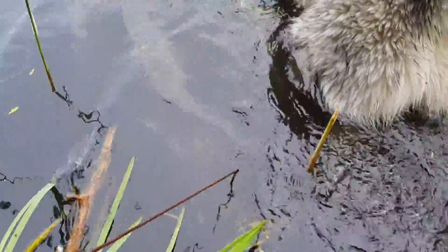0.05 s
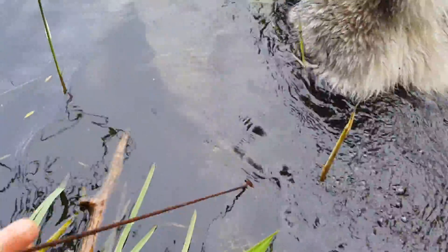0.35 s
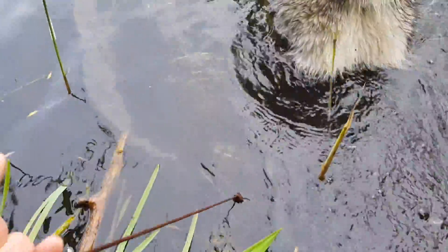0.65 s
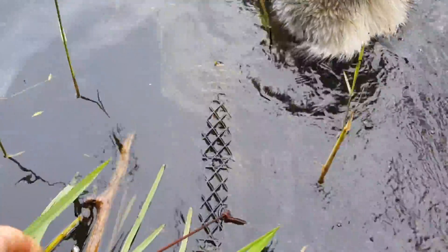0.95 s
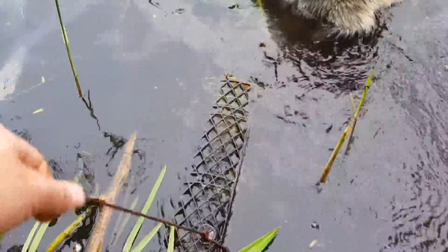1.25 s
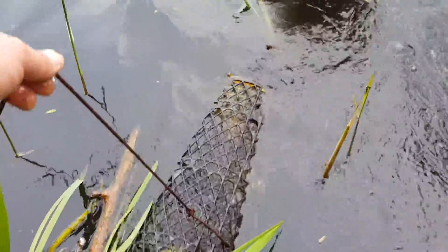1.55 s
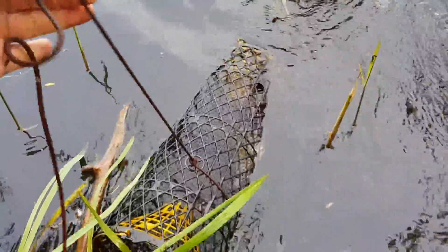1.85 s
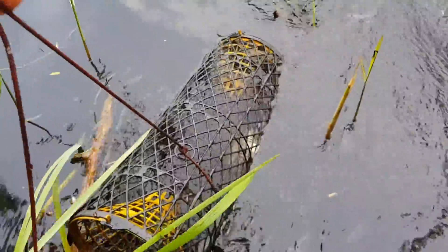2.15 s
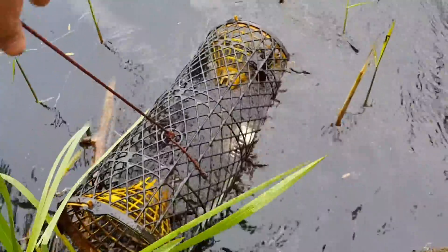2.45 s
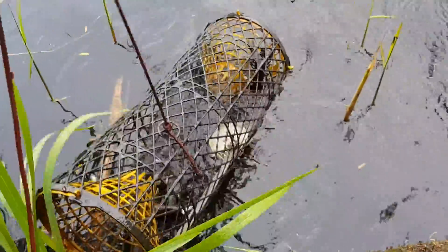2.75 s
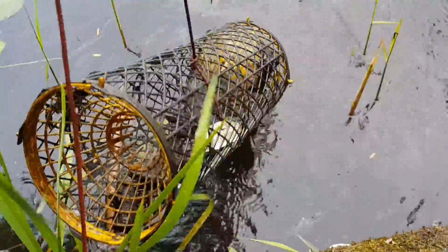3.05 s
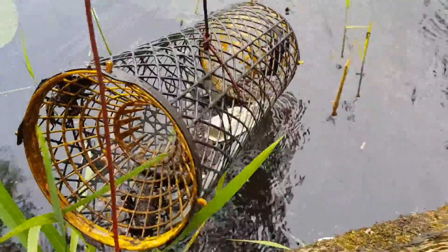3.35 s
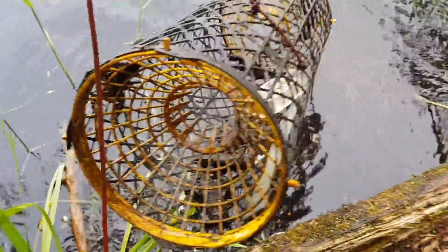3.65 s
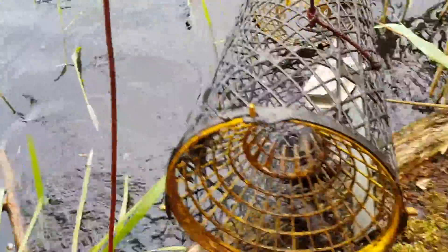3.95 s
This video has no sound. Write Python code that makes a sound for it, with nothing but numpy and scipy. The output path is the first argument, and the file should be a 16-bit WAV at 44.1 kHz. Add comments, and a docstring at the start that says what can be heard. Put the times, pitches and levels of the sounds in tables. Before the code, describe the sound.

Water splashes and drips as a mesh trap is hauled from a pond, birds chirping.

```python
"""At the edge of a pond, a stereo pair close to the water. A mesh trap is hauled out: its cord ticks
and water laps round it, then it breaks the surface with a splash and sheds gushes, single drips and
a last gurgle. The water sounds through ringing bubbles, the small ones high and the large ones low.
A small bird repeats thin falling notes in the trees on the bank, another whistles far off,
over a low outdoor rumble."""
import sys
import numpy as np
from scipy import signal
from scipy.fft import rfft, irfft
from scipy.io import wavfile
from scipy.ndimage import uniform_filter1d

SR = 44100
rng = np.random.default_rng(int(sys.argv[2]) if len(sys.argv) > 2 else 0)


def pcm_store(signal):
    """Save signal as 16-bit PCM."""
    levels = np.round(np.clip(np.atleast_2d(signal), -1, 1) * 32767)
    wavfile.write(sys.argv[1], SR, levels.astype(np.int16).T)


N = 176400
T = np.arange(N) / SR
EDGE_HZ = 16000
MIC_LAG = 3  # samples by which a drip's ring reaches the right microphone later


def amp(db):
    """Decibels to gain."""
    return 10 ** (np.asarray(db) / 20)


def unit(x):
    """Scales to rms 1."""
    return x / np.sqrt(np.mean(x ** 2) + 1e-20)


def read(points, hz):
    """Reads a table on a log-frequency axis."""
    f, value = np.transpose(points)
    return np.interp(np.log(hz + 1), np.log(f + 1), value)


def colour(x, points):
    """Filters by a table of dB over frequency."""
    gain = amp(read(points, np.fft.rfftfreq(2 * N, 1 / SR)))
    return irfft(rfft(x, 2 * N) * gain)[..., :N]


def add(mix, start_s, sound):
    """Mixes a sound in at a time."""
    part = mix[..., max(round(start_s * SR), 0):][..., :sound.shape[-1]]
    part += sound[..., :part.shape[-1]]


def echoes(x, t60_s, build_s):
    """Scattered reflections that build up and die away, different at each microphone."""
    t = T[:SR]
    taps = rng.standard_normal((2, SR)) * (rng.random((2, SR)) < .1)
    taps *= amp(-60 * t / t60_s) * np.minimum(t / build_s, 1)
    taps /= np.linalg.norm(taps, axis=1, keepdims=True)
    return signal.fftconvolve(np.atleast_2d(x), taps, axes=1)[:, :N]


def bubble(hz, decay_s):
    """A ringing bubble whose pitch climbs as it nears the surface, where it bursts."""
    t = T[:int(4 * decay_s * SR) + 8]
    phase = 2 * np.pi * hz * (t + .015 * t * t / decay_s / 2)  # climbs 1.5 % per decay time
    return np.sin(phase) * np.exp(-t / decay_s) * np.cos(np.pi / 2 * t / t[-1])


def patter(per_s, low_hz, high_hz, cycles, spread_db, sizes=40):
    """A rain of bubbles of many sizes, each size from its own place."""
    strikes = (rng.random(N) < per_s / SR) * amp(spread_db * np.minimum(rng.exponential(1, N), 4))
    size, out = rng.integers(0, sizes, N), np.zeros((2, N))
    for k, hz in enumerate(np.linspace(low_hz ** .5, high_hz ** .5, sizes) ** 2):
        ring = hz / high_hz * signal.oaconvolve(strikes * (size == k), bubble(hz, cycles / hz))[:N]
        out += [ring, np.roll(ring, rng.integers(-2, 3 * MIC_LAG))]
    return unit(out)


def air():
    """Low outdoor rumble, alike at both microphones, under a faint diffuse hiss."""
    # background spectrum: frequency_hz, density_db
    spectrum = [(20, -41), (35, -9), (55, -0.5), (110, -1.5), (160, -5), (250, -7.5), (400, -15),
                (650, -25), (1400, -31), (2200, -25), (5500, -27), (9000, -34), (16000, -33)]
    # background level: time_s, level_db
    levels = [(0, -52.5), (.7, -50), (1.2, -53.5), (2.3, -51), (2.7, -50), (4, -49.5)]
    # likeness of left and right: frequency_hz, correlation
    likeness = [(60, 0.96), (290, 0.92), (640, 0.25), (1400, 0.073), (3100, 0.028)]
    left, other = rfft(rng.standard_normal((2, N)))
    same = read(likeness, np.fft.rfftfreq(N, 1 / SR))
    right = same * left + np.sqrt(1 - same ** 2) * other
    noise = irfft(np.array([left, right]), N)
    return unit(colour(noise, spectrum)) * amp(np.interp(T, *np.transpose(levels)))


def swells():
    """Brief low bumps rise and fade a few times."""
    # low swells: middle_s, width_s, level_db
    rises = [(1.52, 0.067, -48), (1.66, 0.039, -46.5), (1.8, .035, -47.5), (2.122, 0.017, -44.5),
             (3.63, 0.045, -50.5), (3.9, 0.14, -51)]
    # their spectrum: frequency_hz, gain_db
    spectrum = [(20, -41), (55, -0.5), (130, 0), (250, -13.5), (600, -36), (2000, -85)]
    level = sum(amp(db) * np.exp(-((T - middle) / width) ** 2 / 2) for middle, width, db in rises)
    return level * unit(colour(rng.standard_normal(N), spectrum))


def far_bird():
    """Far off: soft wavering whistles that reach the microphones only as echoes."""
    # whistles: start_s, length_s, first_hz, last_hz, level_db
    whistles = [(0.2, 0.12, 2550, 2650, -58), (0.377, .16, 2220, 2080, -59.5),
                (0.703, 0.28, 2420, 2200, -56), (1.068, 0.22, 3050, 3000, -66)]
    out = np.zeros(N)
    for start, length, first_hz, last_hz, db in whistles:
        progress = np.linspace(0, 1, int(length * SR))
        waver = 1 + .035 * unit(uniform_filter1d(rng.standard_normal(len(progress)), size=90))
        pitch = waver * (first_hz + (last_hz - first_hz) * progress)
        level = amp(db) * np.abs(np.sin(np.pi * progress)) ** .5
        add(out, start, level * np.sin(2 * np.pi * np.cumsum(pitch) / SR))
    return echoes(out, t60_s=0.34, build_s=0.0024)


def near_bird():
    """On the bank: notes flick down onto a held pitch, some end in a hoarse fall. The trees ring on."""
    # notes: start_s, hold_s, pitch_hz, level_db, closing_fall_hz, left_over_right_db, roughness (0-1)
    notes = [(0.015, 0.063, 5620, -47, 2194, 2.5, 0.16), (0.382, 0.07, 4800, -45.5, -0.5, 0, 0),
             (0.477, .018, 5300, -54.5, -1, 3, 0.3), (.725, .056, 5590, -45, 2248, -3, 0.14),
             (1.112, 0.07, 5596, -45, 2200, 2, 0), (1.456, 0.0865, 4810, -48, -5, 0.5, 0.11),
             (1.561, 0.019, 5140, -55.5, 0, 9, 0.34), (1.788, 0.061, 5620, -44.5, 2192, -3.5, 0.08),
             (2.153, 0.039, 3740, -51, 13, 1, 0.94)]
    # hoarse part of the voice: frequency_hz, gain_db
    rasp_spectrum = [(2500, -46), (3500, -7.5), (4500, -0.5), (5800, 4.5), (6700, 0), (8000, -21)]
    flick_hz, flick_s, sag_per_s = 7100, .0058, .45
    rise_s, release_s = .008, .015
    fall_s, fall_length_s, fall_db = .014, .058, -21
    out, t = np.zeros((2, N)), T[:SR // 4]
    rasp = unit(colour(rng.standard_normal(N), rasp_spectrum))
    for start, hold, hz, db, fall_hz, pan_db, rough in notes:
        fallen = 1 - np.exp(-np.maximum(t - hold, 0) / fall_s)
        hoarse_fall = fallen * (fall_hz > 0)
        flick = (flick_hz - hz) * np.exp(-t / flick_s)
        pitch = hz * (1 - sag_per_s * np.minimum(t, hold)) + flick - fall_hz * fallen
        wobble = unit(uniform_filter1d(rng.standard_normal(len(t)), size=30))
        pitch *= 1 + .06 * (rough + .6 * hoarse_fall) * wobble
        tone = np.sin(2 * np.pi * np.cumsum(pitch) / SR)
        hoarse = amp(-18) * (1 + 3 * rough + 6 * hoarse_fall) * rasp[int(start * SR):][:len(t)]
        end = hold + fall_length_s * (fall_hz > 0)
        release = np.exp(-np.maximum(t - end, 0) / release_s)
        level = np.minimum(t / rise_s, 1) * amp(db + fall_db * fallen) * release
        add(out, start, amp([[pan_db / 2], [-pan_db / 2]]) * level * (tone + hoarse))
    early = amp(3) * echoes(out, t60_s=0.11, build_s=0.0032)
    late = amp(1) * echoes(out.mean(0), t60_s=0.57, build_s=0.049)
    return out + early + late


def fizz():
    """Tiny bubbles burst on the wet mesh."""
    # fizz level: time_s, level_db
    levels = [(0, -58), (.1, -52), (.3, -56), (.55, -55.5), (.75, -61), (.93, -57.5), (1.02, -63.5),
              (1.35, -61.5), (1.8, -61), (2.15, -58), (2.4, -60), (2.7, -62), (3.03, -55), (3.1, -50),
              (3.55, -52.5), (3.75, -55), (3.84, -46.5), (4, -52)]
    bursts = patter(per_s=1500, low_hz=4500, high_hz=15360, cycles=2.8, spread_db=3.5)
    return amp(np.interp(T, *np.transpose(levels))) * bursts


def slosh():
    """A dense wash of middle-sized bubbles as the trap drags through the water."""
    # lapping round the trap: time_s, level_db
    levels = [(0, -64.5), (.12, -57), (.34, -60.5), (.42, -67.5), (1.2, -74), (1.58, -72), (1.66, -63.5),
              (1.85, -66.5), (2.7, -69.5), (2.88, -55), (3.0, -54.5), (3.3, -62), (3.6, -86), (3.76, -60.5),
              (3.84, -56.5), (4, -47.5)]
    # tone of the wash: frequency_hz, gain_db
    tone = [(200, -29.5), (450, 3.5), (700, -4), (1100, -11), (1700, -21), (3000, -7)]
    wash = patter(per_s=1400, low_hz=320.5, high_hz=1980, cycles=5.0, spread_db=5.0)
    return amp(np.interp(T, *np.transpose(levels))) * unit(colour(wash, tone))


def ticks():
    """Short dry snaps as the cord and mesh take the strain."""
    # snaps: start_s, level_db
    snaps = [(.19, -41), (.231, -33.5), (.313, -40), (.459, -39), (.523, -39), (0.681, -29.5), (.702, -36),
             (0.711, -44), (0.827, -32.5), (1.047, -36.5), (1.104, -30), (1.371, -33), (1.386, -44.5),
             (1.756, -37), (1.969, -47), (2.422, -42), (2.606, -39), (2.701, -41), (3.061, -30.5),
             (3.122, -32.5), (3.294, -24.5), (3.488, -34), (3.89, -30.5)]
    # their spectrum: frequency_hz, gain_db
    spectrum = [(500, -42), (2500, -19), (6000, 7.5), (9000, 6), (15000, 1)]
    out, decay_s = np.zeros((2, N)), .00061
    decay = np.exp(-T[:600] / decay_s)
    for start, db in snaps:
        add(out, start, amp(db) * .5 * rng.standard_normal((2, len(decay))) * decay)
    return colour(out, spectrum)


def gurgles():
    """Displaced water makes clusters of large bubbles around a gliding pitch."""
    # bubble clusters: start_s, length_s, first_hz, last_hz, level_db
    clusters = [(0.058, 0.054, 630, 1250, -64), (0.114, 0.021, 1300, 2750, -53),
                (0.276, 0.082, 700, 926, -57.5), (.5, 0.11, 660, 1020, -63.5),
                (0.703, 0.038, 507, 700, -56.5), (2.84, 0.067, 1330, 870, -45),
                (3.076, .08, 1130, 1290, -56), (3.266, 0.12, 1210, 970, -57.5), (3.8, .04, 1030, 1160, -46),
                (3.828, .03, 570, 520, -49.5), (3.874, .045, 1130, 860, -45),
                (3.928, 0.071, 490, 693, -44.5), (3.956, 0.048, 1010, 1180, -44)]
    bubbles_per_s, pitch_spread = 170, .1852
    out = np.zeros(N)
    for start, length, first_hz, last_hz, db in clusters:
        cluster, count = np.zeros(SR // 2), max(int(length * bubbles_per_s), 2)
        for k, (jitter, detune, strength) in enumerate(rng.random((80, 3))[:count]):
            progress = (k + jitter) / count
            hz = (first_hz + (last_hz - first_hz) * progress) * np.exp(pitch_spread * (2 * detune - 1))
            add(cluster, progress * length, (0.19 + strength) * bubble(hz, decay_s=.007))
        add(out, start, amp(db) * cluster * np.sqrt(length * SR / np.sum(cluster ** 2)))
    return np.array([out, np.roll(out, 3 * MIC_LAG)])


def gushes():
    """Sheets of water break into dense droplets and fine spray."""
    # water spilling from the mesh: start_s, length_s, level_db
    spills = [(0.062, 0.15, -63.5), (0.826, 0.12, -62.5), (2.704, 0.06, -49.5), (2.768, 0.027, -40),
              (2.814, 0.031, -41), (2.842, 0.033, -38), (2.892, 0.0092, -44), (2.911, 0.077, -48),
              (3.056, 0.085, -50.5), (3.134, 0.13, -50), (3.285, 0.014, -42.5), (3.367, 0.013, -58),
              (3.394, 0.069, -57), (3.783, 0.12, -52), (3.943, 0.051, -41.5)]
    # tone of the splash: frequency_hz, gain_db
    tone = [(300, -39), (600, -20.5), (1100, -2), (2000, 2.5), (3500, 3), (6000, -2), (8000, -0.5),
            (12500, -9.5), (16000, -16.5)]
    rise_s, fall_s = .0034, .029
    power = np.zeros(N)
    for start, length, db in spills:
        rise = np.clip((T - start) / rise_s, 0, 1)
        fall = np.exp(-np.maximum(T - start - length, 0) / fall_s)
        power += (amp(db) * rise * fall) ** 2
    droplets = patter(per_s=2400, low_hz=700, high_hz=13930, cycles=1.66, spread_db=4.3)
    spray = amp(-8) * rng.standard_normal((2, N))
    return np.sqrt(power) * unit(colour(droplets + spray, tone))


def drips():
    """Close to the microphones: a tick as each drop lands, then its trapped bubble rings."""
    # drops: start_s, level_db, pitch_hz, decay_ms
    drops = [(.166, -37.5, 1660, 1.1), (.17, -38, 2800, 0.65), (.677, -47.5, 1580, 16),
             (1.592, -45, 1790, 18), (2.7643, -25.5, 2730, 2.2), (2.7836, -14, 5680, 1.1),
             (2.79, -42, 5500, 1), (2.796, -28, 3340, 4), (2.821, -32, 3400, 1.5),
             (2.8378, -25.5, 4700, 1.2), (2.857, -19.5, 3270, 0.63), (2.8601, -27.5, 2350, 2.2),
             (2.882, -31.5, 1950, 5.8), (2.891, -27, 830, 2.5), (3.1208, -33.5, 1260, 1.1),
             (3.1612, -29, 5500, 0.71), (3.182, -33, 5300, 1.3), (3.217, -34.5, 5200, 1.2),
             (3.25, -35.5, 3450, 2), (3.294, -30, 3370, 0.76), (3.312, -34.5, 1260, 2.7),
             (3.3332, -29, 5140, 0.96), (3.3471, -26, 4680, 1.6), (3.369, -37, 1500, 1.6),
             (3.444, -38.5, 2940, 4), (3.508, -31.5, 3530, 3.3), (3.545, -32.5, 1855, 9.6),
             (3.597, -31.5, 2550, 5), (3.6175, -35, 3380, 2.8), (3.64, -41, 3740, 1.5),
             (3.708, -46.5, 1690, 4.4), (3.7974, -26, 4400, 1.8), (3.858, -37.5, 3020, 4.7),
             (3.947, -30, 3400, 1.8), (3.948, -30, 565, 13), (3.967, -27.5, 4750, 2.4),
             (3.966, -34, 1017, 12)]
    # spectrum of the landing: frequency_hz, gain_db
    impact_spectrum = [(300, -22), (1200, -33), (3500, 7), (7000, 10.5), (15000, -21)]
    impacts, impact_s = np.zeros((2, N)), .0008
    decay = np.exp(-T[:600] / impact_s)
    for start, db, _, _ in drops:
        add(impacts, start, amp(db - 8) * rng.standard_normal((2, len(decay))) * decay)
    out = colour(impacts, impact_spectrum)
    for start, db, hz, decay_ms in drops:
        ring = np.pad(amp(db) * bubble(hz, decay_ms * 1e-3), (0, MIC_LAG))
        add(out, start, np.array([ring, np.roll(ring, MIC_LAG)]))
    return out


def scene():
    """The trap close by, with short reflections off the bank; birds and air behind."""
    # mesh and reeds scatter mostly treble: frequency_hz, gain_db
    scatter = [(300, -6), (1200, -15), (3000, -0.5), (6000, 0), (16000, 1.5)]
    trap = fizz() + drips() + ticks() + gushes() + gurgles() + slosh()
    reeds = amp(-4) * colour(echoes(trap, t60_s=.03, build_s=0.00066), scatter)
    bank = amp(-13.5) * echoes(trap, t60_s=0.45, build_s=0.013)
    return trap + reeds + bank + near_bird() + far_bird() + air() + swells()


def record(dry):
    """Each microphone's colour, then the band limit."""
    # left microphone response: frequency_hz, gain_db
    left_mic = [(300, -0.97), (700, -5.5), (2400, -1.5), (4400, 0.5), (6300, -6.5), (7500, -2.5),
                (10000, -3), (13000, -1), (16000, -8)]
    # right microphone response: frequency_hz, gain_db
    right_mic = [(300, -1.7), (700, -7.5), (2400, 0.5), (4400, 4.5), (6300, 7.5), (7500, -2), (10000, 2.5),
                 (13000, 7.5), (16000, 3.5)]
    heard = np.array([colour(dry[0], left_mic), colour(dry[1], right_mic)])
    band_limit = signal.firwin(511, EDGE_HZ, window=("kaiser", 9), fs=SR)
    return signal.oaconvolve(heard, band_limit[None], "same")


dry = scene()
out = record(dry)
pcm_store(out)
```